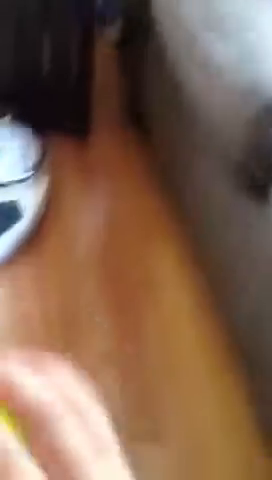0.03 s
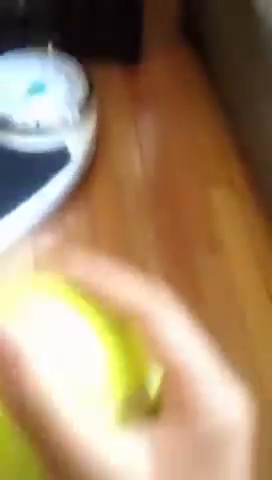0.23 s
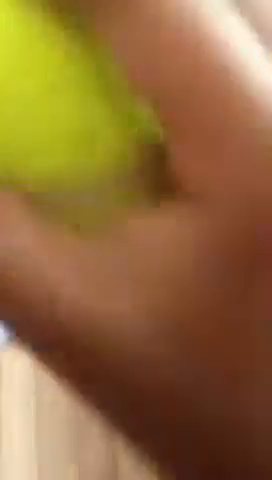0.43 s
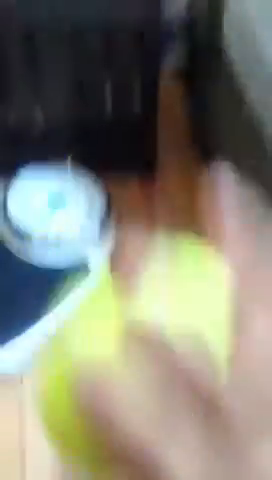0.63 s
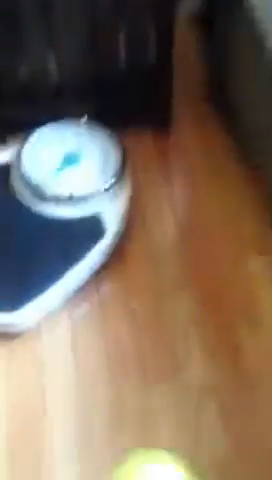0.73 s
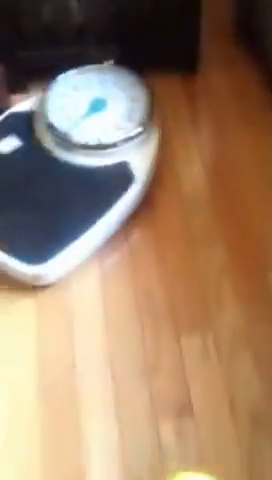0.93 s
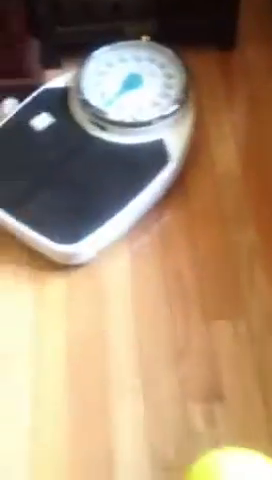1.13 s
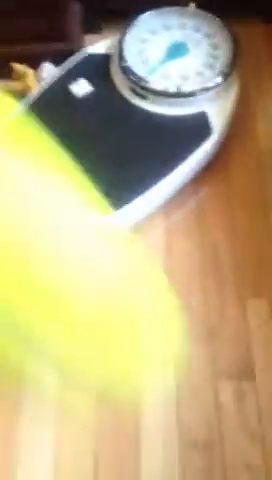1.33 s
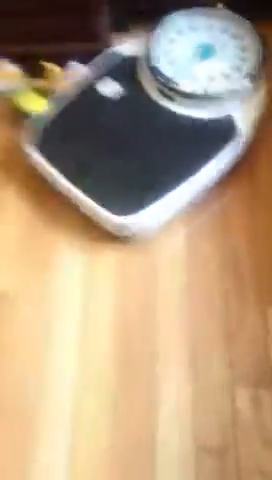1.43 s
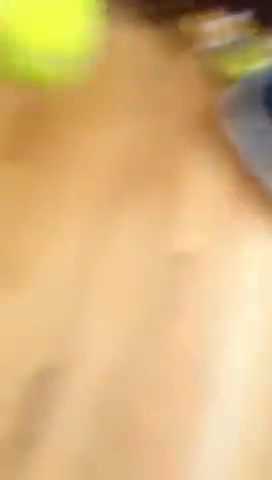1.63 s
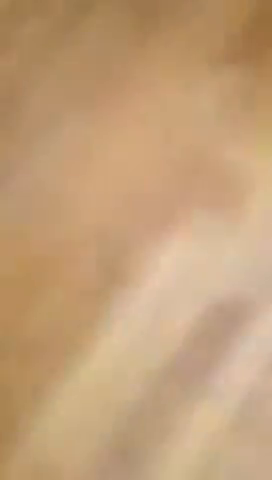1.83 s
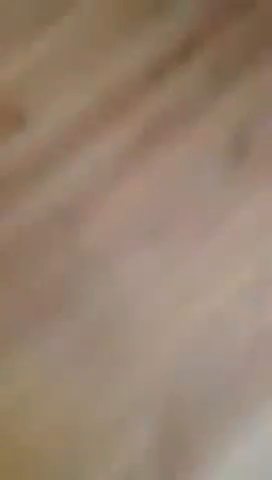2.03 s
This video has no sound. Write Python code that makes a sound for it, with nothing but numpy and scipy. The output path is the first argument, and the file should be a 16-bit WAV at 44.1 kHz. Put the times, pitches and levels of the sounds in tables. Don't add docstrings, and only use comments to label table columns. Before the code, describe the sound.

A tennis ball bounces twice on a wooden floor, two sharp hollow pops in a small room

```python
import sys
import numpy as np
from scipy import signal
from scipy.fft import rfft, irfft
from scipy.io import wavfile
from scipy.ndimage import uniform_filter1d, map_coordinates

SR = 44100
rng = np.random.default_rng(int(sys.argv[2]) if len(sys.argv) > 2 else 0)


def volts_from_decibels(level):
    exponent = np.asarray(level, float) / 20
    return 10 ** exponent


def inscribe(sig):
    pcm = np.round(np.clip(np.atleast_2d(sig).T, -1, 1) * 32767)
    wavfile.write(sys.argv[1], SR, pcm.astype(np.int16))


N = 91287

# (time [s], pop level [dB], pop frequency [Hz], boards level [dB], room level [dB])
BOUNCES = [
    (0.8581, -10, 2760, -26, -35.5),
    (1.88356, -13, 2160, -29.5, -37),
]
# (frequency [Hz], level per Hz [dB])
FELT_SPECTRUM = [(880, -52.5), (2670, -8.5), (5190, -2), (9000, 0), (12500, 0), (14000, -1.5), (15300, -12)]


def unit(x):
    return x / np.sqrt(np.mean(x ** 2) + 1e-20)


def along(points, hz):
    f, v = np.transpose(points)
    return np.interp(np.log(hz + 1), np.log(f + 1), v)


def since(s):
    return np.maximum(np.arange(N) / SR - s, 0)


def hiss(spectrum, patchy_db):
    z = signal.stft(rng.standard_normal(N + 512), nperseg=512)[2]
    field = uniform_filter1d(rng.standard_normal(z.shape), size=6, axis=0)
    field = uniform_filter1d(field, size=10, axis=1)
    x = signal.istft(z * volts_from_decibels(patchy_db * unit(field)), nperseg=512)[1][:N]
    gain = volts_from_decibels(along(spectrum, np.fft.rfftfreq(N, 1 / SR)))
    return unit(irfft(rfft(x) * gain, N))


def air():
    # (frequency [Hz], level per Hz [dB])
    air_spectrum = [(25, -22), (60, -15), (120, -1), (300, 0), (550, -4), (1000, -11), (2500, -17),
                    (10000, -25.5), (14000, -23)]
    return volts_from_decibels(-65) * hiss(air_spectrum, patchy_db=1.2)


def pop(s, hz, cycles):
    u = since(s) * hz
    return -np.sin(2 * np.pi * u) * u / cycles * np.exp(1 - u / cycles)


def strokes(rows):
    t = np.arange(N) / SR
    total = np.zeros(N)
    for s, db, rise, fall in rows:
        width = np.where(t < s, rise, fall)
        total += volts_from_decibels(db) * np.exp(-.5 * ((t - s) / width) ** 2)
    return total


def hands():
    # (time [s], level [dB], rise [s], fall [s])
    brushes = [(.09, -70.5, 0.029, 0.042), (0.32, -69, 0.048, 0.053), (.59, -61.5, 0.023, 0.02),
               (.705, -73, 0.029, 0.016), (1.244, -61.5, 0.012, 0.0068), (1.29, -65, 0.017, 0.018),
               (2.02, -65.5, 0.05, 0.05), (.003, -67, .01, 0.017)]
    # (time [s], level [dB], rise [s], fall [s])
    rubs = [(.085, -63, 0.04, 0.075), (.3, -61.5, 0.052, 0.094), (.44, -73, 0.018, 0.058),
            (2.01, -61.5, 0.081, 0.09)]
    # (frequency [Hz], level per Hz [dB])
    palm_spectrum = [(410, -17), (1080, -5), (2060, -6.5), (3900, -8), (4700, -3.5), (6270, -1),
                     (7700, -5.5), (8300, -14), (13000, -34.5)]
    # (time [s], level [dB], frequency [Hz], decay [cycles])
    knocks = [(.002, -53.5, 241, 1.4), (1.2241, -48, 332, 0.72), (1.2266, -47.5, 1560, 0.47),
              (1.68, -62, 76, 0.63), (1.714, -54, 94, 1), (1.742, -52.5, 166, 0.68),
              (1.772, -45, 118, 0.66), (1.788, -45, 148, 0.44), (2.047, -43.5, 380, 1.3),
              (2.053, -37, 290, 0.37), (2.064, -32, 160, 2.1)]
    fingers = strokes(brushes) * hiss(FELT_SPECTRUM, patchy_db=1)
    palms = strokes(rubs) * hiss(palm_spectrum, patchy_db=1.5)
    thuds = sum(volts_from_decibels(db) * pop(s, hz, cycles) for s, db, hz, cycles in knocks)
    return fingers + palms - thuds


def squash(s, hz):
    pop_cycles, roundness = 1.5, 0.35
    u = np.minimum(since(s) * hz, pop_cycles)
    return -np.sin(2 * np.pi * u) * np.abs(np.sin(np.pi * u / pop_cycles)) ** roundness


def shell_and_echoes(s, pop_db, hz, delays, levels):
    felt_hz, leak_db = 5300, -11
    shell = volts_from_decibels(pop_db) * squash(s, hz)
    for delay, db in zip(delays, levels):
        shell += volts_from_decibels(pop_db + db) * squash(s + delay, hz)
    felt = signal.butter(N=4, Wn=felt_hz, fs=SR, output="sos")
    return signal.sosfiltfilt(felt, shell) + volts_from_decibels(leak_db) * shell


def wander(per_s):
    points = rng.standard_normal(int(N * per_s / SR) + 4)
    return map_coordinates(points, [np.arange(N) * per_s / SR])


def ring_boards(s, modes, hold_s):
    lag_s, rise_s = .0006, .0007
    settle_s, settle_db = 0.0074, -14
    wander_rad, wander_per_s = 1.1, 30
    t = since(s + lag_s)
    settle = volts_from_decibels(settle_db / 2 * (1 + np.tanh((t - hold_s) / settle_s)))
    drift = wander_rad * (1 - np.exp(-t * wander_per_s))
    ringing = np.zeros(N)
    for f, db, t60 in modes:
        phase = 2 * np.pi * f * t + drift * wander(wander_per_s)
        ringing += volts_from_decibels(db - 60 * t / t60) * np.sin(phase)
    return (1 - np.exp(-t / rise_s)) * settle * ringing


def tail(s):
    # (frequency [Hz], level per Hz [dB])
    tail_spectrum = [(240, -19), (480, -3.5), (630, -12), (939, -7.5), (1550, 1), (2400, -2.5),
                     (4750, -10.5), (5250, -19), (9000, -31), (22000, -110)]
    # (frequency [Hz], t60 [s])
    tail_t60 = [(400, 0.49), (1500, 0.42), (4000, 0.42), (6000, .2), (9000, 0.08)]
    rise_s, early_db, early_t60 = 0.00011, 14, 0.014
    hz, t, z = signal.stft(rng.standard_normal(SR), SR, nperseg=256)
    z = z * volts_from_decibels(along(tail_spectrum, hz))[:, None]
    level = np.sqrt(np.mean(signal.istft(z, SR, nperseg=256)[1] ** 2))
    decay = volts_from_decibels(-60 * t / along(tail_t60, hz)[:, None])
    x = signal.istft(z * decay, SR, nperseg=256)[1][:SR] / level
    t = since(s)
    shape = (1 - np.exp(-t / rise_s)) * (1 + volts_from_decibels(early_db - 60 * t / early_t60))
    return shape * np.pad(x, (round(s * SR), N))[:N]


def ball():
    # (frequency [Hz], level [dB], t60 [s])
    board_modes = [
        [(70.4, -7, 0.11), (149, -8, 0.33), (179.3, -8.5, 0.3), (229.8, -4.5, 0.38), (254.5, 1.5, 0.33),
         (275.4, 7.5, 0.083), (310, -5.5, 0.7), (352, -3.5, 0.09), (474, -7, 0.094), (565, -24, 0.45),
         (715, -18.5, 0.097), (1573, 4.5, .04), (932, -16, 0.044)],
        [(73, -12, 0.4), (149.4, -4, 0.8), (183.8, -3, 0.2), (201, 3, 0.13), (245.7, 3, 0.18), (297, 1, 0.11),
         (331, -9.5, 0.24), (511.5, -10, 0.15), (880, -4, 0.14), (2040, 3, 0.041)],
    ]
    echo_delays = [
        [.0012, .0034, .0107, .0157, .0175, .021],
        [.0023, .0047, .0112, .0156, .019, .023],
    ]
    echo_levels = [
        [-30, -28, -16.5, -14, -17, -19],
        [-9, -41, -15.5, -14.5, -21, -16],
    ]
    holds_s = (0.1, 0.077)
    out = np.zeros(N)
    for bounce, modes, delays, levels, hold_s in zip(BOUNCES, board_modes, echo_delays, echo_levels, holds_s):
        s, pop_db, hz, board_db, room_db = bounce
        out += shell_and_echoes(s, pop_db, hz, delays, levels)
        out += volts_from_decibels(board_db) * ring_boards(s, modes, hold_s)
        out += volts_from_decibels(room_db) * tail(s)
    return out


def fuzz():
    t60 = 0.034
    fades = np.zeros(N)
    for db, bounce in zip((-58.5, -50), BOUNCES):
        t = since(bounce[0])
        fades += volts_from_decibels(db - 60 * t / t60) * (t > 0)
    return fades * hiss(FELT_SPECTRUM, patchy_db=1)


def booms():
    # (frequency [Hz], level per Hz [dB])
    boom_spectrum = [(60, -23), (110, -7), (180, -3), (260, -7.5), (350, -10), (500, -31), (800, -49.5)]
    t60, rise_s = 0.82, 0.023
    fades = np.zeros(N)
    for db, bounce in zip((-41, -41.5), BOUNCES):
        t = since(bounce[0])
        fades += volts_from_decibels(db - 60 * t / t60) * (1 - np.exp(-t / rise_s))
    return fades * hiss(boom_spectrum, patchy_db=2)


def case():
    # (time [s], level [dB], upper resonance level re lower [dB])
    ticks = [(2.047, -38, -14), (2.05188, -25.5, 1), (2.0527, -36, -9), (2.0554, -33, -7),
             (2.0561, -34, -7), (2.0575, -38, -12), (2.0598, -41, -14), (2.0632, -43, -3),
             (2.0688, -39, -9)]
    # (frequency [Hz], level per Hz [dB])
    rattle_spectrum = [(250, -12), (400, 3), (900, 3), (2300, -2), (4500, -6), (6500, -6), (9500, -12),
                       (15500, -17)]
    low_hz, low_cycles = 2300, .42
    high_hz, high_cycles = 6900, .7
    rattle_s, rattle_db, rattle_t60 = 2.0465, -42, .25
    ringing = np.zeros(N)
    for s, db, bright_db in ticks:
        low = pop(s, low_hz, low_cycles)
        high = volts_from_decibels(bright_db) * pop(s, high_hz, high_cycles)
        ringing += volts_from_decibels(db) * (low + high)
    t = since(rattle_s)
    fade = volts_from_decibels(rattle_db - 60 * t / rattle_t60) * np.tanh(t / rattle_t60 * 20)
    return ringing + fade * hiss(rattle_spectrum, patchy_db=1)


def scene():
    return (air() + hands() + ball() + fuzz() + booms() + case())[None]


def low_pass(x):
    return signal.sosfilt(signal.butter(12, 15330, fs=SR, output="sos"), x)


def record(dry):
    mic_low_hz, top_hz = 119, 15300
    low_cut = signal.butter(N=2, Wn=mic_low_hz, btype="high", fs=SR, output="sos")
    spectrum = rfft(signal.sosfilt(low_cut, dry))
    band = irfft(spectrum * (np.fft.rfftfreq(N, 1 / SR) < top_hz), N)
    return low_pass(band)


dry = scene()
out = record(dry)
inscribe(out)
```